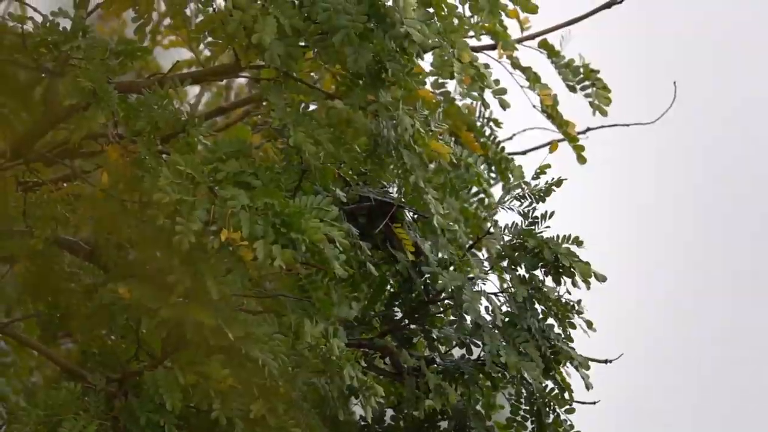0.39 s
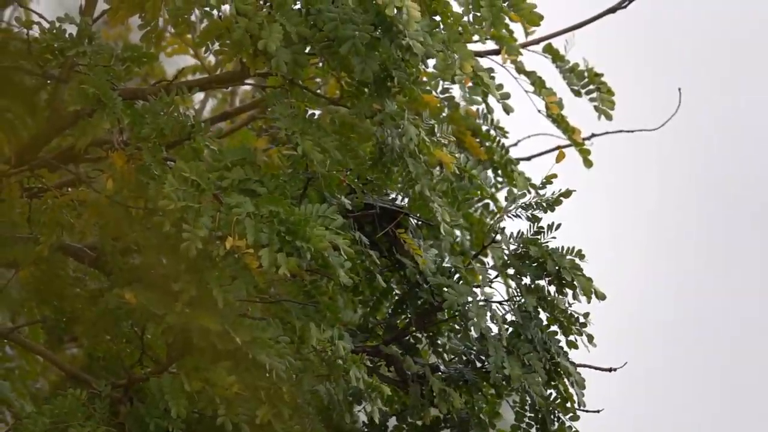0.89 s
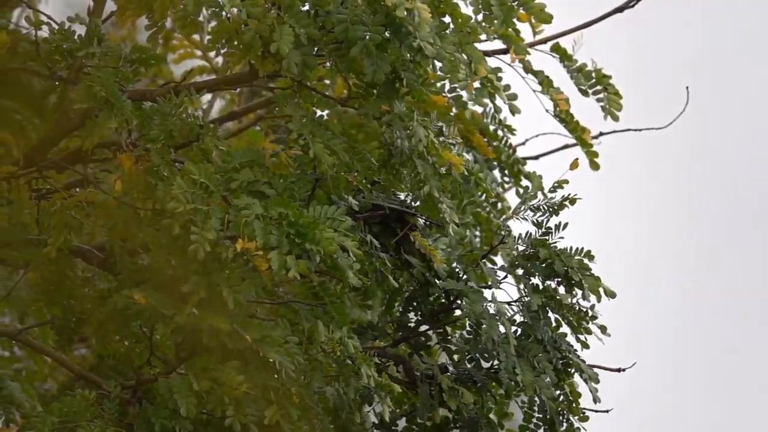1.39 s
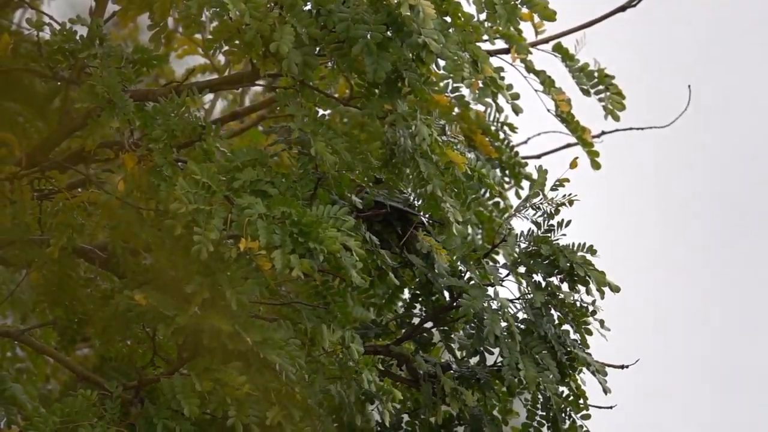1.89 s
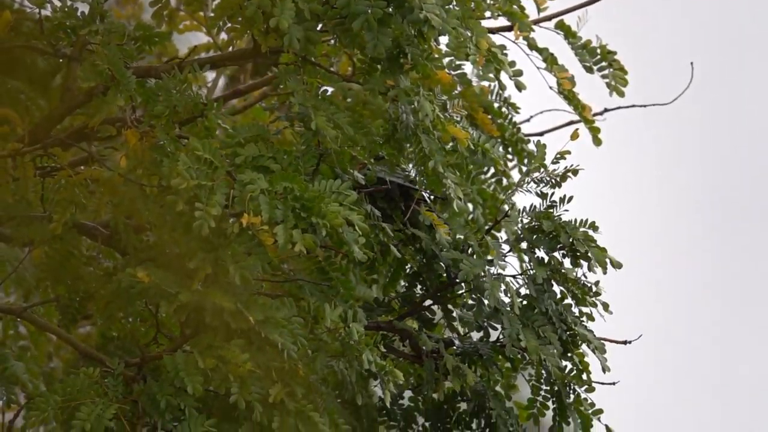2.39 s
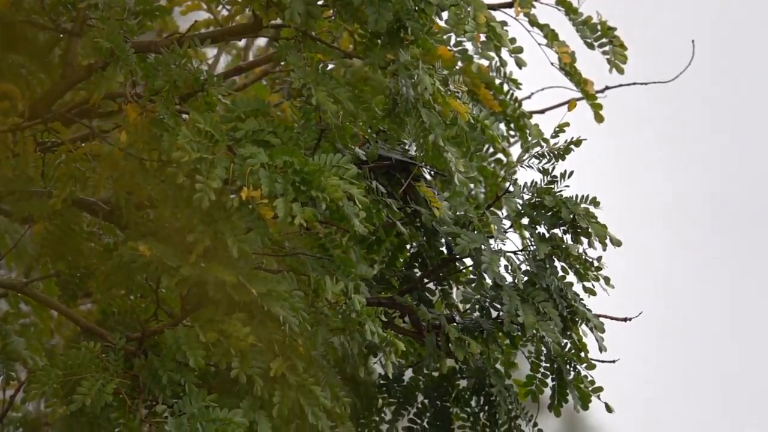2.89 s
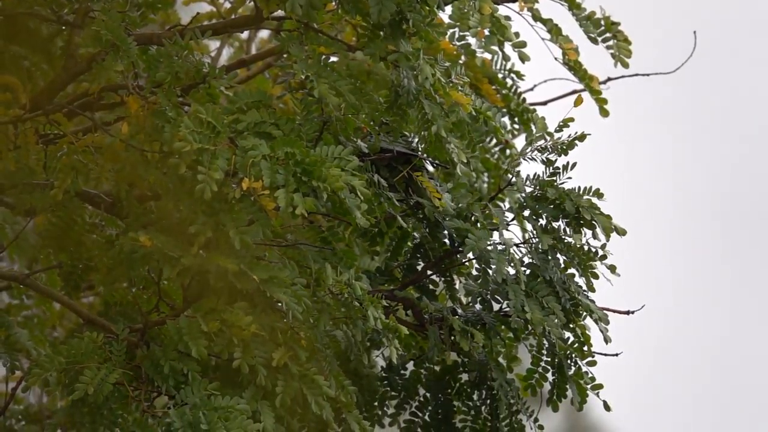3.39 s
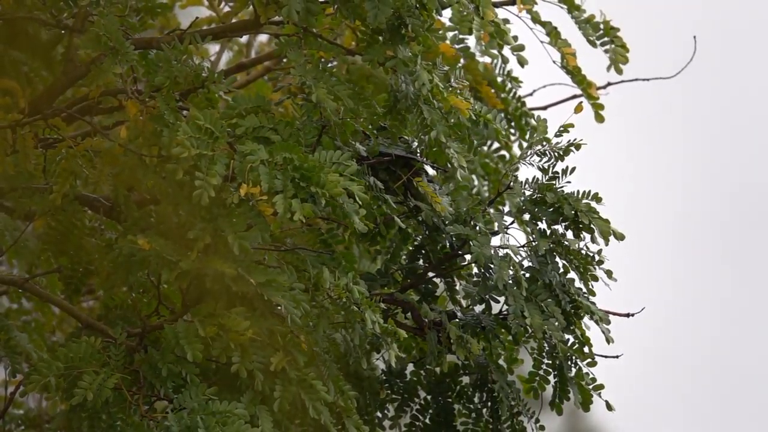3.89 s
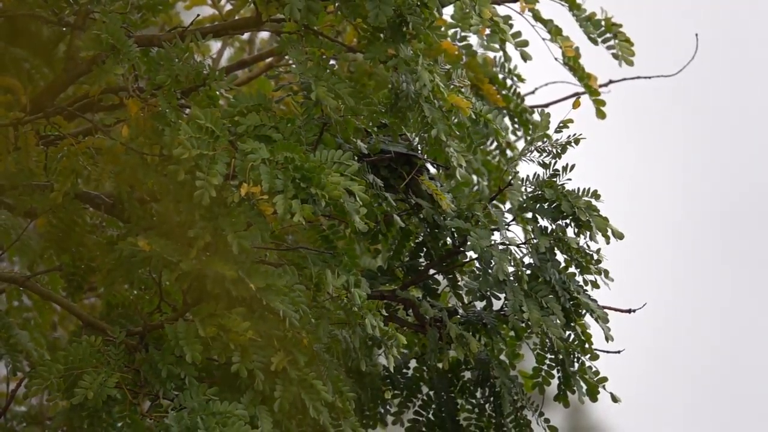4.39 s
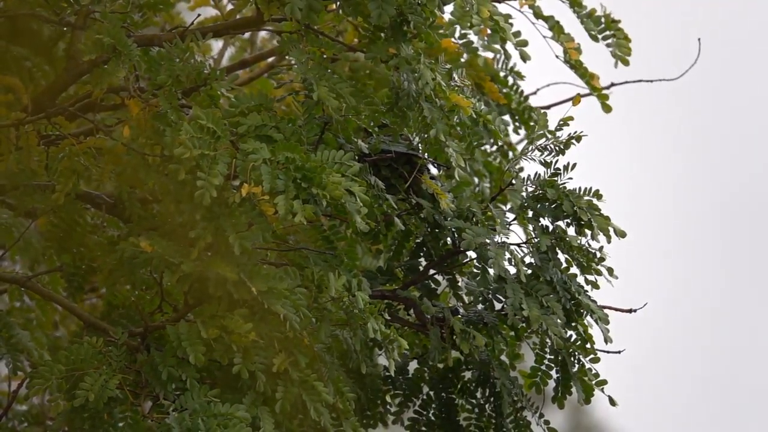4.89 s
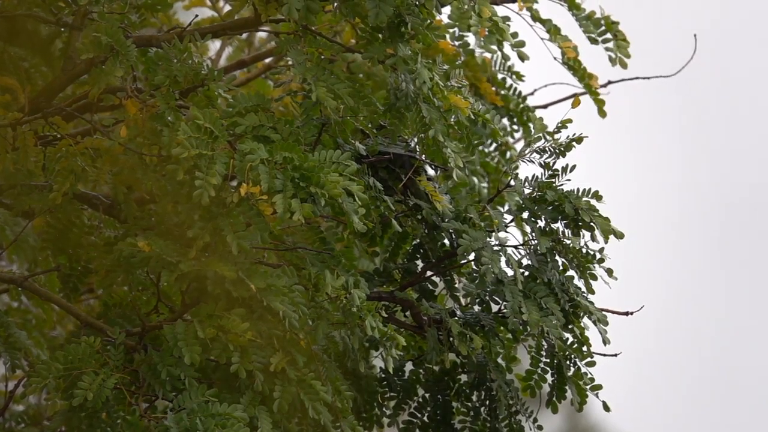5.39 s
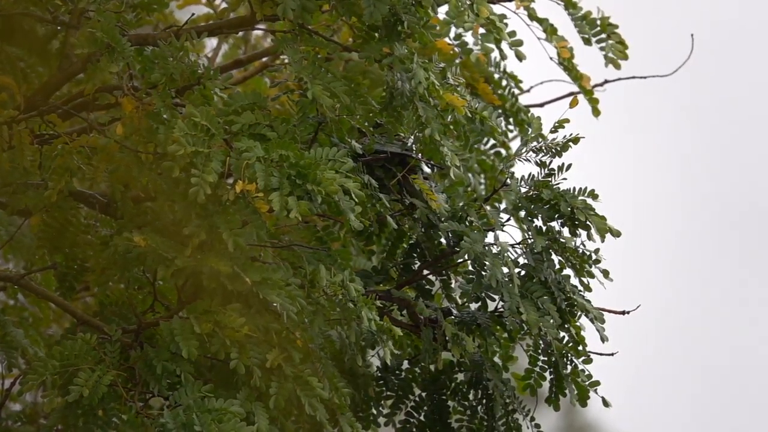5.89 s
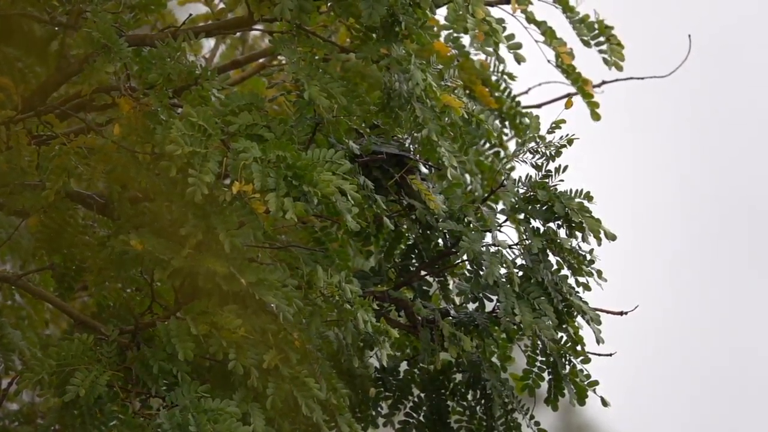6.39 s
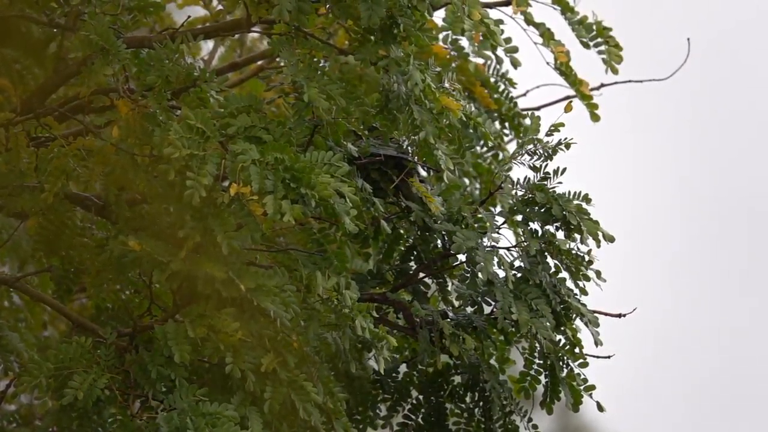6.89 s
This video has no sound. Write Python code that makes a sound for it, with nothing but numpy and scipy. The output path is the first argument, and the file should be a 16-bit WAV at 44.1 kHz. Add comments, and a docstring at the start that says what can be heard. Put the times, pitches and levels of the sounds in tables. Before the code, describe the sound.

Dense, raspy, high-pitched bird chatter from many parrots outdoors, pierced by brief gliding whistles, above a soft far-off traffic murmur.

```python
"""A flock of parrots chatters in leafy trees, heard from the ground on a small microphone with two ports.
Near birds pipe short gliding whistles with overtones; the rest of the flock blurs into many random squeaks
over a harsh screech of shaped noise. Foliage scatters the calls and adds a faint rustle of treble noise.
A town murmurs far off as low-pitched noise and rumble, with one engine, a sine, slowly picking up speed."""
import sys
import numpy as np
from scipy import signal
from scipy.fft import rfft, irfft, next_fast_len
from scipy.io import wavfile
from scipy.ndimage import uniform_filter1d

SR = 44100
rng = np.random.default_rng(int(sys.argv[2]) if len(sys.argv) > 2 else 0)


def master_out(mix):
    """Clip the mix to full scale and print it as 16-bit PCM to the path in sys.argv[1]."""
    frames = np.transpose(np.atleast_2d(mix))
    ceiling = np.clip(frames, -1, 1)
    pcm = np.round(ceiling * 32767).astype(np.int16)
    wavfile.write(sys.argv[1], SR, pcm)


def field_ratio(decibels):
    """Amplitude ratio for a level in dB (20 dB per decade); scalars and array-likes work."""
    return 10 ** (np.asarray(decibels, dtype=float) / 20)


N = 309141  # samples, about 7 s


def evened(x):
    """Scales to rms 1."""
    return x / np.sqrt(np.mean(x ** 2) + 1e-20)


def read_spectrum(points, hz):
    """Reads a spectrum's dB between its points, on a log-frequency axis."""
    point_hz, value = np.transpose(points)
    return np.interp(np.log(hz + 1), np.log(point_hz + 1), value)


def add(mix, s, sound):
    """Mixes a sound in from s seconds on."""
    part = mix[round(s * SR):][:len(sound)]
    part += sound[:len(part)]


def wobble(count, size):
    """Smooth chance variation of rms 1; size is the smoothing in samples."""
    return evened(uniform_filter1d(uniform_filter1d(rng.standard_normal(count), size), size))


def hiss(db_field, patchy_db):
    """Two unrelated noises whose short-time spectra follow db_field(hz, t), with shared random patches."""
    hz = np.fft.rfftfreq(1024, 1 / SR)[:, None]
    t = np.arange(N // 256 + 5) * 256 / SR
    a, b, c, d, patches = rng.standard_normal((len(t), len(hz), 5)).T
    patches = uniform_filter1d(uniform_filter1d(patches, size=10, axis=0), size=10, axis=1)
    gain = field_ratio(db_field(hz, t) + patchy_db * evened(patches))
    spectra = np.array([a + 1j * b, c + 1j * d]) * gain
    return signal.istft(spectra, nperseg=1024, noverlap=768)[1][:, :N]


def whistle(length, start_hz, end_hz, octave_db, arch, rough):
    """The syrinx: a gliding near-sine with overtones, its pitch shivering and its strength coming in lumps."""
    count = round(length * SR)
    u = np.arange(count) / count  # progress through the call, 0-1
    glide_hz = start_hz + (end_hz - start_hz) * u
    hz = glide_hz * (1 + arch * 4 * u * (1 - u) + rough * wobble(count, size=120))
    phase = 2 * np.pi * (np.cumsum(hz) / SR + rng.random())
    overtones = np.sin(2 * phase) + 0.29 * np.sin(3 * phase) * (hz < 5200)
    tone = np.sin(phase) + field_ratio(octave_db) * overtones
    lumps = field_ratio(2.8 * wobble(count, size=200))
    swell = np.sin(np.pi * u) ** 0.24  # quick rise and fall
    return evened(tone * lumps * swell)


def foliage(x, wet_db, t60):
    """Trunks and leaves scatter the call back: sparse taps of random sign, dying away, others for each port."""
    taps = np.zeros((2, SR // 2))
    at = np.arange(200, SR // 2 - 20, 20)  # one tap somewhere in each 20 samples
    decay = field_ratio(-60 * at / SR / t60)
    for port in taps:
        port[at + rng.integers(0, 20, len(at))] = rng.choice([-1., 1.], len(at)) * decay
    scattered = signal.oaconvolve(x[None], taps / np.linalg.norm(taps[0]), axes=1)[:, :N]
    return x + field_ratio(wet_db) * scattered


def near_birds():
    """The whistles one could point at: the higher, the purer; the loudest turn shrill with overtones."""
    # near calls, one row a clear tone, level before the foliage:
    # (time [s], length [s], start pitch [Hz], end pitch [Hz], level [dB])
    calls = [(0.052, 0.1, 5780, 5860, -43.5), (0.132, 0.16, 5450, 5800, -42.5),
             (0.15, 0.09, 4330, 4180, -39.5), (0.7, 0.038, 5780, 5730, -40.8),
             (0.765, 0.065, 5500, 6100, -43), (0.808, 0.028, 5600, 5570, -38),
             (0.768, 0.066, 4470, 5350, -43), (0.817, 0.06, 4540, 5350, -41),
             (0.845, 0.04, 6080, 6600, -40), (0.851, 0.075, 3090, 3620, -42.5),
             (0.93, 0.062, 6260, 6700, -40.5), (0.945, 0.062, 3180, 3350, -47),
             (1.375, 0.056, 4200, 4500, -38.5), (1.243, 0.071, 7470, 8000, -43.5),
             (1.283, 0.1, 6800, 6740, -44), (1.315, 0.099, 2400, 2300, -48),
             (1.385, 0.046, 2410, 2730, -50), (1.44, 0.065, 2480, 2260, -46),
             (1.45, 0.049, 3480, 3480, -44), (1.71, 0.055, 4200, 3900, -42), (1.434, 0.11, 5220, 5350, -41),
             (1.666, 0.1, 6400, 6190, -40.5), (1.718, 0.094, 2820, 2510, -47.5),
             (1.707, 0.074, 5330, 5390, -36), (1.803, 0.028, 3610, 3620, -35),
             (1.86, 0.051, 3660, 3680, -38.5), (1.895, 0.028, 3530, 3200, -39),
             (1.905, 0.025, 4000, 4270, -36.5), (1.935, 0.035, 3080, 3080, -46),
             (1.918, 0.18, 5320, 5380, -42), (1.967, 0.08, 7300, 7100, -42.5),
             (1.995, 0.068, 3130, 3030, -45.5), (2.17, 0.058, 7320, 7290, -44.5),
             (2.25, 0.076, 2960, 3250, -47), (2.68, 0.073, 5080, 5000, -41), (3.135, 0.03, 3800, 3350, -45),
             (2.9, 0.13, 8500, 8950, -54), (2.921, 0.052, 3500, 3300, -46.5),
             (2.994, 0.075, 3670, 3610, -46), (3.165, 0.083, 3570, 3950, -47),
             (3.195, 0.052, 5490, 5560, -37), (3.274, 0.05, 3060, 3120, -51),
             (3.696, 0.065, 5670, 5740, -41), (3.767, 0.064, 5840, 6110, -40),
             (3.881, 0.053, 6200, 6130, -42), (3.95, 0.12, 4720, 4640, -31.5),
             (4.02, 0.097, 5480, 5280, -41), (4.255, 0.028, 4750, 3800, -41),
             (4.299, 0.046, 3560, 3270, -45), (4.458, 0.052, 2450, 2460, -38),
             (4.488, 0.064, 2740, 2900, -46), (4.53, 0.039, 3330, 3370, -48),
             (4.542, 0.041, 4750, 4850, -34), (4.591, 0.031, 3920, 3870, -35.5),
             (4.638, 0.032, 5900, 5850, -41), (4.647, 0.043, 6070, 4700, -32.5),
             (4.657, 0.027, 5600, 4930, -38), (4.715, 0.093, 3520, 3380, -42),
             (4.74, 0.025, 3770, 3850, -40), (4.75, 0.052, 2670, 2746, -41), (4.83, 0.035, 3420, 3550, -42),
             (4.86, 0.04, 3900, 4300, -43), (5.042, 0.095, 3900, 3970, -43),
             (5.418, 0.054, 3550, 3440, -46), (5.418, 0.038, 3310, 2480, -49),
             (5.585, 0.045, 4100, 4350, -42), (5.65, 0.04, 4080, 4020, -41), (5.76, 0.055, 2400, 3030, -49),
             (5.86, 0.034, 3650, 3420, -45), (5.895, 0.03, 3340, 3500, -41), (5.98, 0.091, 3290, 3410, -45),
             (6.05, 0.04, 2600, 2900, -52), (5.882, 0.03, 5950, 5930, -36.5),
             (5.965, 0.095, 2380, 2470, -47), (6.085, 0.078, 2880, 2320, -44),
             (6.211, 0.054, 3550, 3470, -45), (6.315, 0.029, 4800, 4020, -39),
             (6.36, 0.051, 3250, 2990, -45), (6.515, 0.05, 2760, 2710, -46), (6.56, 0.05, 3300, 3400, -53),
             (6.57, 0.084, 5640, 5860, -47), (6.4, 0.043, 2750, 2760, -44.5),
             (6.44, 0.042, 2740, 2420, -44), (6.476, 0.054, 3534, 3370, -40.5),
             (6.633, 0.15, 4500, 4720, -42)]
    overtone_db, overtone_db_per_khz = 2.5, -3.5  # overtone level at 0 Hz and its slope with pitch
    effort_db, overtone_per_effort = -36, 1.3  # above this level, overtone dB gained per dB
    out = np.zeros(N)
    for s, length, start_hz, end_hz, db in calls:
        mean_khz = (start_hz + end_hz) / 2000
        octave_db = overtone_db + overtone_db_per_khz * mean_khz
        octave_db += overtone_per_effort * max(db - effort_db, 0)
        add(out, s, field_ratio(db) * whistle(length, start_hz, end_hz, octave_db, arch=0.0098, rough=0.0082))
    return foliage(out, wet_db=-11, t60=.15)


def flock():
    """Many squeaks at random times and pitches over a harsh screech; both swell with the flock."""
    # the whole flock's course: (time [s], relative level [dB], treble tilt [dB per octave])
    flock_course = [(0.0, -39, 0.3), (0.02, -39, 1.3), (0.25, -38.5, 1), (0.39, -43, 0.5),
                    (0.54, -38.5, 0.5), (0.66, -43, 0), (0.92, -36, -0.2), (1.03, -41.5, 0.3),
                    (1.17, -37, 1), (1.23, -44.5, -2.5), (1.29, -38, 1.7), (1.66, -41, 3), (1.7, -40, -2),
                    (2.05, -38, 0.5), (2.11, -41.5, 0.8), (2.32, -37.5, 1.6), (2.42, -44.5, 0.6),
                    (3.65, -43.5, 2.4), (3.79, -38, 2), (3.98, -44.5, -0.5), (4.08, -41, 3), (4.2, -44, -1),
                    (4.31, -38, -0.9), (4.88, -38, -1), (4.96, -46.5, 1), (5.11, -37.5, -2.5),
                    (5.21, -43, -0.5), (5.99, -40, -0.6), (6.37, -42, -1.5), (6.46, -41, -1.5),
                    (6.95, -43.5, -1), (7.01, -42, 0)]
    # voices after air and leaves: (frequency [Hz], relative spectrum level [dB])
    flock_colour = [(1500, -40), (2200, -8), (3000, 0), (3800, 4), (5500, 4), (6600, -0.5), (8000, -3.5),
                    (10500, -7.5), (12500, -13.5), (15500, -22)]
    squeaks_per_s = 270
    squeaks = np.zeros(N)
    for when, long, pitch, glide, arch, loud, bright in rng.random((round(squeaks_per_s * N / SR), 7)):
        length = .011 + .03 * long ** 2
        start_hz = 2300 * 2.8 ** pitch
        end_hz = start_hz * (1 + 1.4 * (glide - .5) ** 3)
        squeak = whistle(length, start_hz, end_hz, -12 + 16 * bright, arch=.07 * (arch - .5), rough=.011)
        add(squeaks, when * N / SR, field_ratio(-9 * loud) * squeak)
    s, db, tilt_db = np.transpose(flock_course)

    def field(hz, t):
        """The flock's colour at its present level and tilt."""
        octaves = np.clip(np.log2((hz + 1) / 4500), -1, 1.5)
        return read_spectrum(flock_colour, hz) + np.interp(t, s, db) + octaves * np.interp(t, s, tilt_db)

    # even the squeaks out over pitch and time, then give them the flock's colour and course
    hz, t, z = signal.stft(squeaks, SR, nperseg=512)
    pitch_rms = np.sqrt(uniform_filter1d((abs(z) ** 2).mean(1), size=9))[:, None]
    moment_rms = np.sqrt(uniform_filter1d((abs(z) ** 2).mean(0), size=16))
    z = z / (pitch_rms + .07 * pitch_rms.max()) * moment_rms.mean() / moment_rms
    z = z * field_ratio(field(hz[:, None], t) - 20.8)
    squeaks = foliage(signal.istft(z, SR, nperseg=512)[1][:N], wet_db=-10, t60=.16)
    flutter = field_ratio(0.5 * wobble(N, size=90))  # rasping throats
    screech = hiss(field, patchy_db=2.5) * flutter
    surge = field_ratio(1 * wobble(N, size=3000))  # quick chance swells of 1 dB rms
    return surge * (squeaks + field_ratio(-22.1) * screech)


def leaves():
    """A faint steady rustle of leaves in the treble: shaped noise."""
    # rustle: (frequency [Hz], relative spectrum level [dB])
    leaf_colour = [(3000, -40), (7000, 2), (11000, -3), (16000, -3)]
    rustle = hiss(lambda hz, t: read_spectrum(leaf_colour, hz) + 0 * t, patchy_db=0.0)
    return field_ratio(-54.5) * evened(rustle)


def town():
    """Distant tyre roar as shaped noise, low rumble as a narrow noise band, and one engine as a sine."""
    # far roar: (frequency [Hz], relative spectrum level [dB])
    town_colour = [(12, -41), (20, -11), (38, -16.5), (58, 7.5), (107, -6), (409, -11.5), (677, -8.5),
                   (988, -10.5), (1100, -8.5), (2060, -12.5), (2380, -12.5), (3000, -17), (3900, -16.5),
                   (6600, -120)]
    # heavy traffic near 55 Hz: (time [s], relative level [dB])
    rumble_course = [(0.0, -50), (5.04, -47.5), (6.79, -55), (6.89, -42), (7.01, -36)]
    # engine, silent outside these times: (time [s], mean firing rate [Hz], mean level [dB])
    engine_course = [(2.9, 97, -56), (4.0, 100.7, -56), (5.5, 108.2, -56.5), (6.2, 120.8, -52),
                     (6.5, 124.5, -52)]
    t = np.arange(N) / SR
    roar = evened(hiss(lambda hz, t: read_spectrum(town_colour, hz) + 0 * t, patchy_db=2.0))
    low_band = signal.butter(3, (44, 70), "bandpass", fs=SR, output="sos")
    low = signal.sosfilt(low_band, rng.standard_normal(N))
    rumble = evened(low) * field_ratio(np.interp(t, *np.transpose(rumble_course)) - 2.5)
    s, hz, db = np.transpose(engine_course)
    firing_hz = np.interp(t, s, hz) * (1 + 0.0135 * wobble(N, size=3000))
    firing = np.sqrt(2) * np.sin(2 * np.pi * np.cumsum(firing_hz) / SR)  # rms 1
    engine = firing * field_ratio(np.interp(t, s, db, -100, -100) + 1.3 * wobble(N, size=2000))
    return field_ratio(-43) * roar + rumble + engine


def scene():
    """Birds, leaves and town: two channels that share the direct calls and differ in scatter and noise."""
    return near_birds() + flock() + leaves() + town()


def top_cut(x):
    """Nothing passes above the cut-off."""
    return signal.sosfilt(signal.butter(12, 16600, fs=SR, output="sos"), x)


def record(dry):
    """Two close ports: a phase lead sets them apart, and the left has sound of its own in the middle band."""
    # the ports: (frequency [Hz], phase by which the left leads [rad], left port's own scattered sound [0-1])
    port_response = [(60, 0, 0), (300, -.25, .25), (600, -.3, .42), (1000, -.1, .45), (1600, .15, .3),
                     (3000, .85, .8), (3600, 1.6, .4), (4300, 2.4, 0), (4850, 3.1416, 0),
                     (17480, 21.991, 0)]
    edge_hz = 15750  # the microphone's upper band limit
    size = next_fast_len(N + SR // 10)
    hz = np.fft.rfftfreq(size, 1 / SR)
    point_hz, *columns = np.transpose(port_response)
    lead, own = (np.interp(hz, point_hz, column) for column in columns)
    left, right = rfft(dry, size) * (hz < edge_hz)
    left = right + own * (left - right)
    left = left * field_ratio(2.5 * own)  # makes up level lost in blending the two
    left, right = left * np.exp(.5j * lead), right * np.exp(-.5j * lead)
    ports = irfft(np.array([left, right]), size)[:, :N]
    return top_cut(ports)


dry = scene()
out = record(dry)
master_out(out)
```